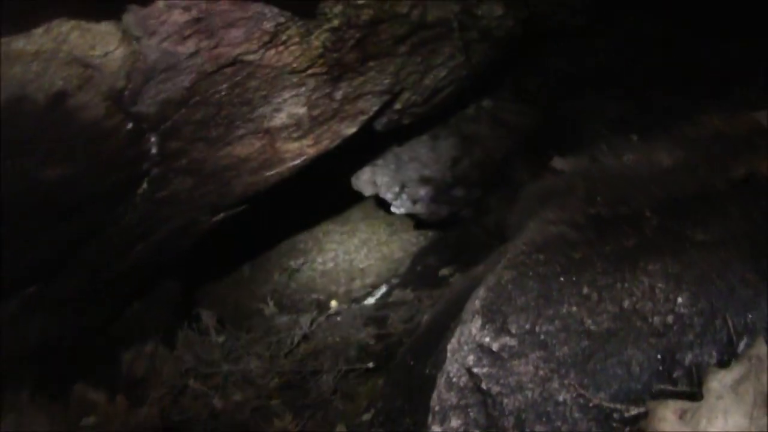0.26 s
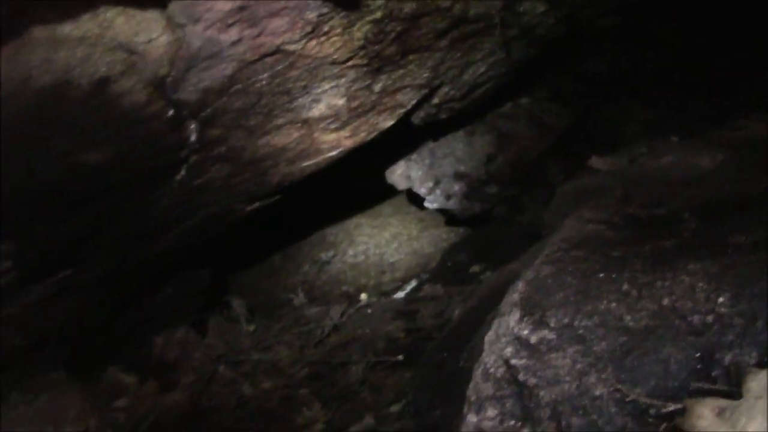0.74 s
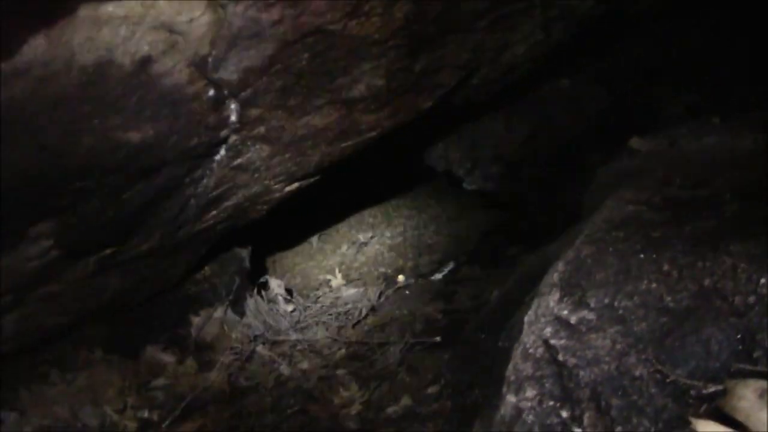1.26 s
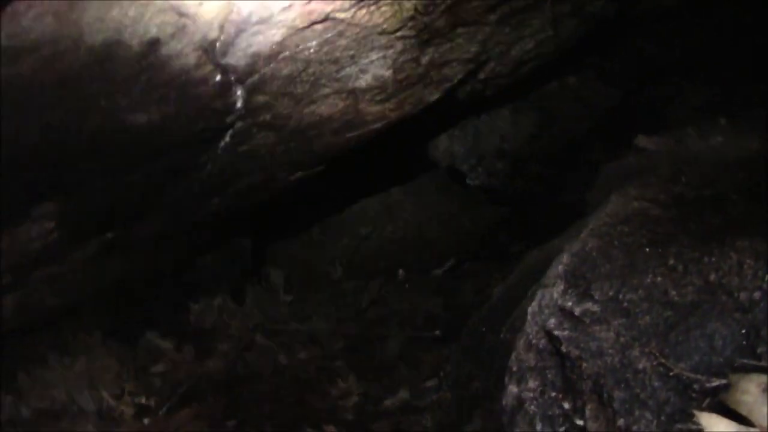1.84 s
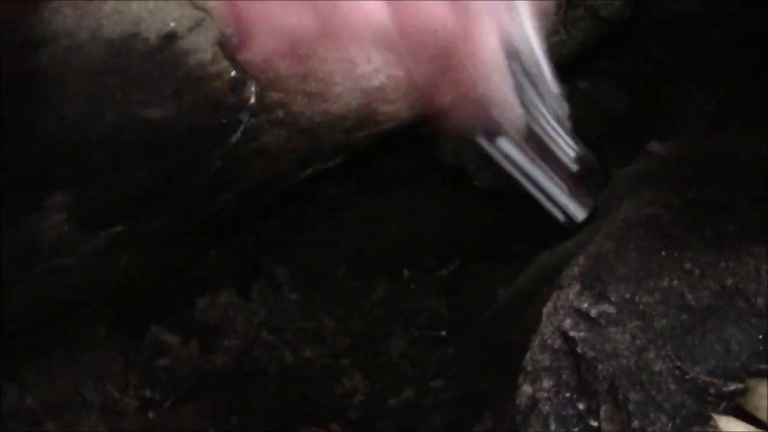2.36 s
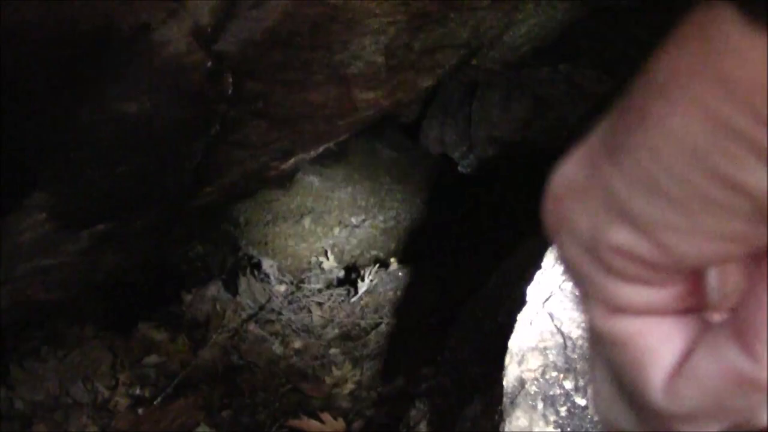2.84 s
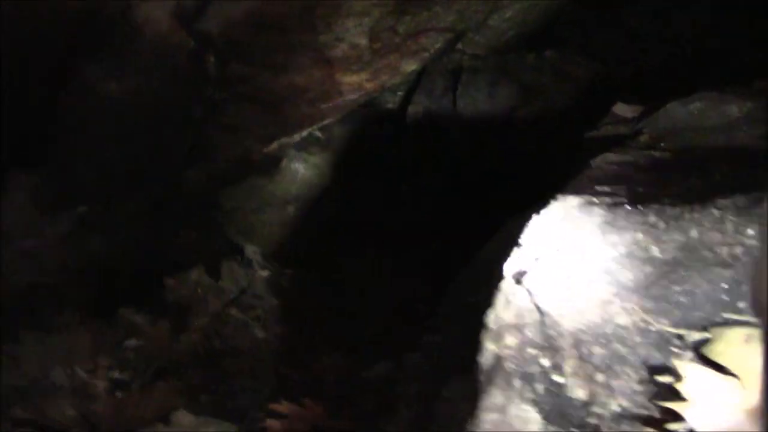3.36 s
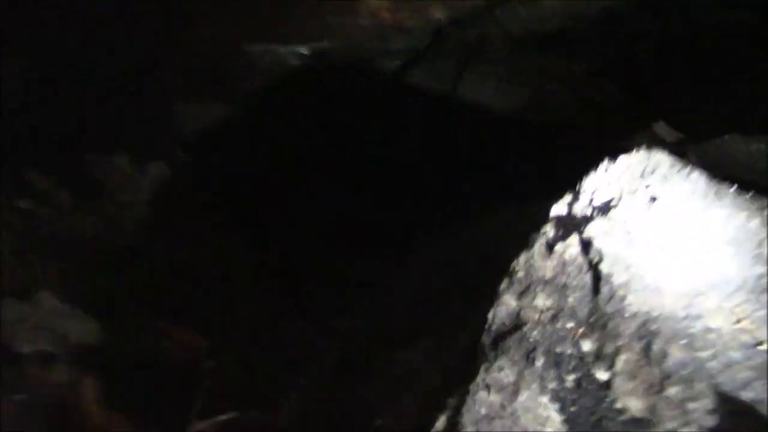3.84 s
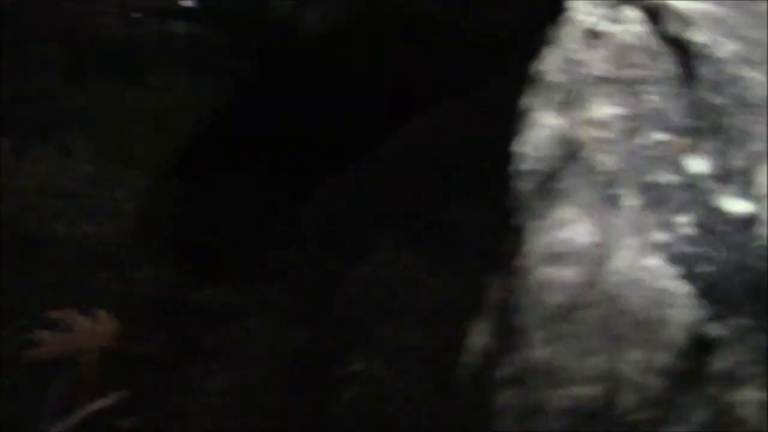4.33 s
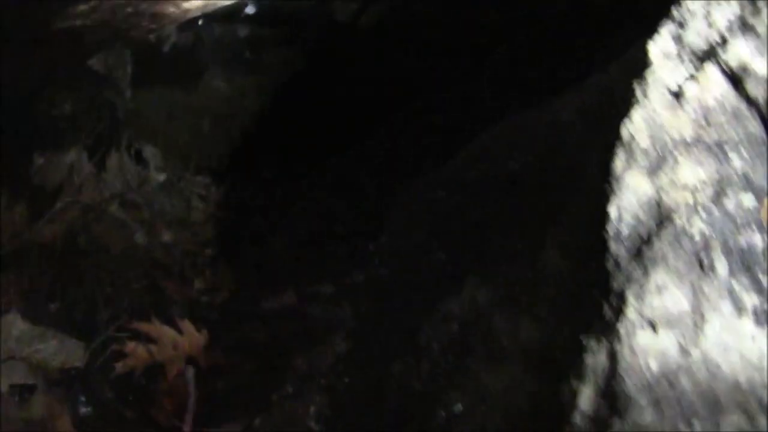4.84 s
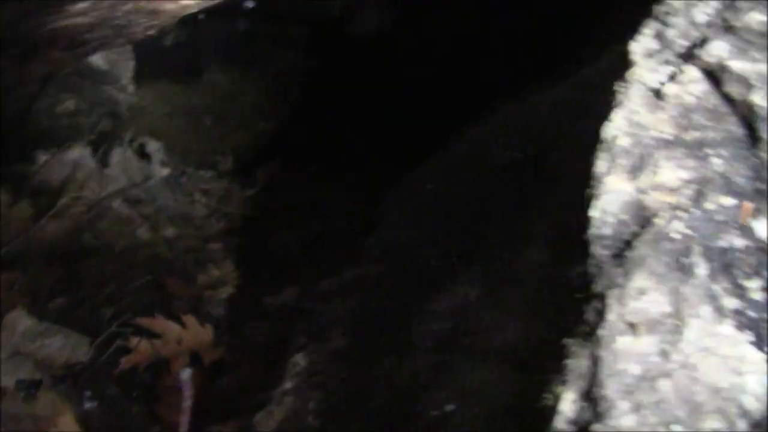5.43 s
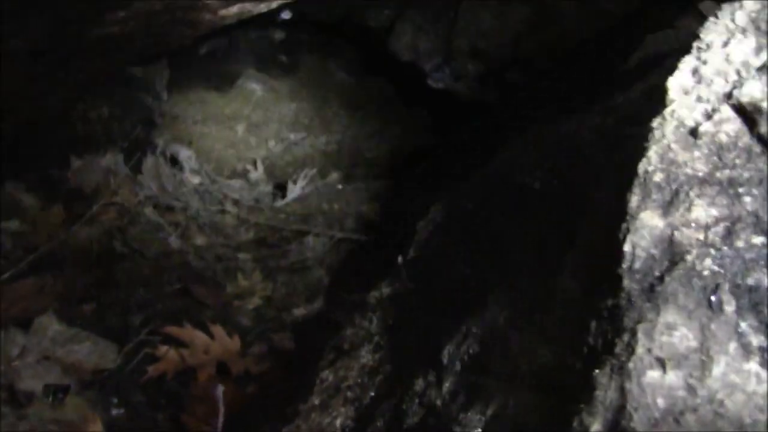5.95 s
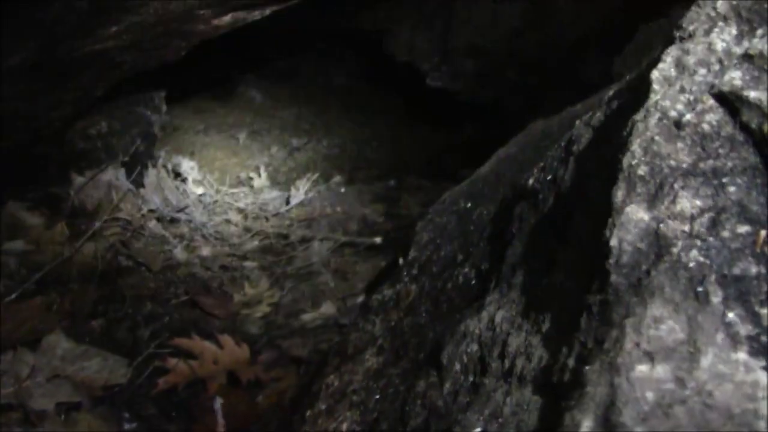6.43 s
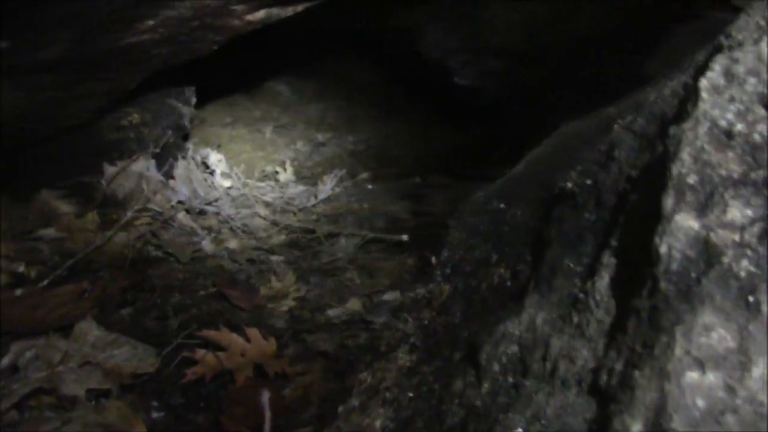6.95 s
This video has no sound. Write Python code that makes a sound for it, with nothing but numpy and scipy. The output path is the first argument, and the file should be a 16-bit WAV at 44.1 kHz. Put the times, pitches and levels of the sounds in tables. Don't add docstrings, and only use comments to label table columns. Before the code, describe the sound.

Close up in a rocky hollow in the woods, dry leaves tick quietly over a faint wash of air. A hand begins brushing them, with brittle snaps and low thumps on the camera body. It then shoves deep, making a loud, dense crunch full of breaking twigs. The crackling thins to scattered snaps and small settling ticks.

```python
import sys
import numpy as np
from scipy import signal
from scipy.fft import rfft, irfft
from scipy.io import wavfile
from scipy.ndimage import uniform_filter1d

SR = 44100
rng = np.random.default_rng(int(sys.argv[2]) if len(sys.argv) > 2 else 0)


def wrap_up_sound(samples):
    columns = np.atleast_2d(samples).T
    tamed = np.clip(columns, -1, 1)
    steps = np.round(tamed * 32767).astype(np.int16)
    wavfile.write(sys.argv[1], SR, steps)


def to_linear_factor(level_db):
    exponent = np.asarray(level_db, float) / 20
    return 10 ** exponent


N = 317079

# [f/Hz, level/dB per Hz]
AIR_SPECTRUM = [(15, -33), (25, -2), (170, 0), (249, -6), (354, -3), (560, -11), (734, -10.5), (2160, -18),
                (7510, -29), (12900, -30.5), (15800, -36)]
# [f/Hz, likeness 0-1]
AIR_LIKENESS = [(60, 0.67), (290, 0.48), (1400, 0.62), (15000, 0.55)]
AIR_DB = -42

# [lowest ring f/Hz, highest ring f/Hz, ring/cycles, cracks per s, size spread/dB]
LEAF_KINDS = [
    (480, 2050, 2.5, 1500, 3.0),
    (2500, 6400, 7, 3500, 3.6),
    (7000, 13800, 8, 4500, 3.6),
]
HIGH_RING_POWER = [.9, 1.0, .15]

# [t/s, level/dB]
BED = [(0, -47.5), (.3, -66.5), (1.5, -55), (1.69, -45), (1.89, -48), (2.1, -47), (3.0, -47.5),
       (3.1, -43.5), (3.33, -43.5), (3.47, -26.5), (4.0, -24), (4.33, -29.5), (4.43, -39), (4.93, -46),
       (4.98, -50.5), (5.6, -65), (5.74, -49), (6.0, -59)]
BRUSHES = [(.399, -44.5, 0.12, 0.13, 0.5), (1.917, -34, 0.0084, 0.093, 0.5),
           (1.987, -28, 0.019, 0.033, 2.5), (2.179, -36, 0.17, 0.18, -2), (2.291, -31, 0.062, 0.071, 0),
           (2.42, -40, 0.14, 0.022, 0), (2.509, -43.5, 0.089, 0.085, -2), (2.626, -32.5, 0.033, 0.024, -1),
           (2.724, -39.5, 0.13, 0.031, 0), (2.849, -41.5, 0.13, 0.1, 1), (2.978, -37.5, 0.016, 0.078, 0),
           (4.488, -32.5, 0.029, 0.23, 2.5), (4.64, -32.5, 0.032, 0.019, 6),
           (4.851, -41, 0.058, 0.083, 6.5), (4.934, -39, 0.077, 0.022, 8), (5.019, -35.5, 0.013, 0.071, 7),
           (5.108, -39.5, 0.081, 0.053, 2), (5.28, -41, 0.068, 0.079, 1), (5.465, -42, 0.11, 0.06, 0.5),
           (5.535, -42, 0.067, 0.011, -0.5), (5.78, -40.5, 0.042, 0.088, 3.5),
           (5.873, -34, 0.052, 0.044, 0), (5.936, -36.5, 0.074, 0.0061, -1),
           (6.525, -40, 0.025, 0.029, -0.5)]
SHOVES = [
    (3.372, -33.5, 0.026, 0.043, -4),
    (3.487, -27, 0.046, 0.32, 0.5),
    (3.727, -20, 0.09, 0.1, 1),
    (3.876, -19.5, 0.1, 0.076, 6.5),
    (4.08, -15, 0.066, 0.1, 1.5),
    (4.352, -18, 0.0077, 0.014, 2),
]
SLUMPS = [
    (.12, -48, .04, 0.12, 1),
    (.56, -53.5, 0.037, 0.15, -3),
    (.86, -52, .02, 0.031, -7),
    (5.65, -57.5, 0.037, 0.06, 14),
    (6.226, -48.5, 0.022, 0.12, -1.5),
    (6.61, -48.5, .02, 0.055, -3),
    (6.76, -54, 0.054, 0.043, 5),
    (6.96, -58, .05, 0.041, 6.5),
]
GRIPS = [(1.968, -33, 0.0055, 0.024, -2), (2.012, -34.5, .02, 0.028, 1), (2.023, -34, 0.0099, .007, 3),
         (3.415, -35, 0.023, 0.035, -2), (3.5, -33, 0.026, 0.021, 0), (3.7, -31, 0.014, 0.044, -5),
         (3.858, -23, .008, .04, 1), (3.892, -21.5, .03, 0.02, 7), (3.945, -20, 0.028, 0.036, 3),
         (4.034, -23, .008, 0.064, 8), (4.13, -21.5, .012, 0.073, 0), (4.2, -23.5, .03, 0.066, 7),
         (4.31, -19.5, 0.0072, .012, 4), (4.4, -28, 0.032, 0.025, 0), (4.57, -43.5, .05, 0.05, 7),
         (4.975, -39, 0.0078, .008, 1), (5.43, -46, 0.027, .04, -4), (5.055, -34.5, 0.026, 0.031, 2.5),
         (5.84, -38.5, 0.012, 0.067, 0), (5.907, -35.5, .04, 0.045, 1)]
STROKE_DB, STROKE_BEND = 15.5, 0.97
SOFT_DB, SOFT_PER_DB, SOFT_TILT = -1.5, -0.1337, 0.89
EDGE_DB, EDGE_PER_DB = -1.5, -0.0543
REST_FROM_DB, REST_PER_DB, REST_S = 23.5, 0.1, 0.015

# [t/s, echo share 0-1]
ROCK_SHARE = [
    (4.9, 0),
    (5.2, .15),
    (5.95, .15),
    (6.1, 0),
]
ROCK_LAG = 17
ROCK_SOFT_DB = 10

TICKS = [(0.059, -23, 5900, 8600, 1.2), (0.1216, -18.5, 4030, 6500, 1.5), (0.15, -27, 2600, 9800, 1.4),
         (0.3502, -22, 2470, 5200, 2.2), (0.3861, -26, 2500, 7900, 2), (0.508, -24, 1800, 5300, 0.5),
         (0.52, -25.5, 1900, 4580, 0.69), (0.6004, -30, 2200, 6200, 1.65), (0.7761, -24.5, 3350, 8400, 1.3),
         (0.8601, -28, 4000, 8400, 0.76), (0.9632, -31, 3400, 8400, 1.32),
         (1.1274, -28.5, 2500, 8450, 0.95), (1.3538, -16.5, 4700, 10700, 0.53),
         (1.78, -24, 2600, 9900, 0.83), (5.26, -27, 2900, 12200, 1.3), (5.278, -23, 1800, 9400, 1.1),
         (5.4595, -20, 2400, 9500, 0.75), (5.5406, -25, 2200, 9400, 0.9), (5.6149, -28, 3700, 9450, 0.66),
         (5.758, -24, 4600, 7400, 0.9), (5.8357, -20, 3400, 11300, 0.56), (5.9295, -19, 2100, 9100, 0.46),
         (5.943, -19.5, 4200, 12000, 1.7), (6.2149, -25, 1800, 13100, 2.4), (6.529, -29, 2400, 8400, 0.5),
         (6.5484, -25, 6000, 14000, 0.69), (6.5976, -20.5, 5560, 12600, 1.2),
         (6.989, -18, 3150, 10200, 0.6), (7.1768, -28, 2600, 9200, 0.9)]
RIBS = [(1.9174, -20.5, 4030, 11000, 1.9), (1.9746, -12, 2100, 10000, 1), (2.073, -23.5, 2100, 7600, 1),
        (2.1908, -7.5, 2270, 8300, 0.47), (2.273, -9, 6850, 13400, 0.55), (2.2986, -10.5, 2480, 11100, 1.2),
        (2.3538, -12, 2600, 11800, 0.87), (2.3662, -20, 3700, 11500, 0.81),
        (2.3924, -15.5, 3400, 10000, 1.05), (2.4154, 0, 2800, 13600, 0.65),
        (2.503, -15.5, 4100, 11200, 0.96), (2.5162, -21.5, 2500, 10000, 0.8),
        (2.5658, -11, 4970, 12200, 0.91), (2.6243, -1.5, 3850, 10300, 0.63),
        (2.634, -16, 5200, 11500, 0.74), (2.6413, -11, 5500, 13900, 0.77), (2.6935, -19, 5600, 13100, 0.68),
        (2.7105, -8, 3840, 11400, 0.45), (2.786, -5.5, 5860, 13200, 0.78), (2.8189, -14, 7600, 12700, 0.54),
        (2.8437, -16, 2740, 9000, 1.8), (2.874, -15, 4930, 12400, 1.0), (2.933, -20, 4420, 10700, 2.9),
        (2.9727, -13, 4700, 10100, 0.59), (2.98, -6.5, 3150, 10500, 0.77), (3.0241, -12, 2330, 6500, 0.7),
        (3.0335, -13, 5140, 13800, 0.87), (3.0738, -17, 2400, 9300, 0.6), (3.175, -19.5, 4400, 9600, 0.73),
        (3.3075, -23, 3000, 7300, 0.6)]
TWIGS = [(3.371, -13, 6800, 13700, 1.7), (3.473, -5, 4070, 10400, 1.2), (3.5893, 1, 2710, 8900, 0.88),
         (3.6227, -2.5, 2130, 6950, 1), (3.7264, -6, 4500, 9400, 2), (3.7933, 2, 4100, 8100, 0.42),
         (3.857, -3, 2000, 9600, 1.3), (3.9163, 0, 2900, 5300, 0.7), (3.948, -4, 3500, 7900, 0.5),
         (4.032, -3.5, 5400, 12500, 1.1), (4.1035, -3, 5460, 11500, 0.5), (4.127, -12, 2200, 8800, 0.8),
         (4.1665, -8, 2800, 6500, 0.56), (4.202, -8, 2000, 9200, 0.62), (4.3066, -12, 3500, 10500, 1.5),
         (4.3518, -4.5, 3820, 8250, 1.38), (4.3784, -9, 4500, 14300, 0.66),
         (4.4234, -1.5, 4830, 11200, 0.62), (4.481, -4, 3900, 8800, 0.69), (4.5242, -13, 5400, 7700, 1.1),
         (4.6429, -13, 2390, 10900, 0.9), (4.712, -19.5, 3240, 9900, 2.3), (4.7573, -21, 2600, 11900, 1.7),
         (4.8071, -16, 2200, 12600, 0.65), (4.9309, -18, 2250, 12700, 1.3),
         (4.955, -15.5, 9700, 13300, 1.6), (4.98, 0, 3480, 12200, 0.37), (5.015, -11, 3930, 14800, 0.99),
         (5.0334, -17, 7100, 12400, 1.7), (5.0956, -20, 2200, 10000, 0.98)]
# [break t/s, peak level/dB, centre f/Hz]
SPLINTERS = [(0.0057, -28, 2580), (0.0623, -34, 2100), (0.1288, -29, 6000), (0.2295, -25, 2400),
             (0.301, -27, 2100), (0.3553, -24, 4460), (0.5027, -31, 3600), (0.7425, -34, 1900),
             (0.7492, -35, 3400), (0.778, -24, 2210), (0.8002, -36, 1900), (0.8761, -40, 4800),
             (1.1752, -34, 8650), (1.5667, -31.5, 4100), (1.5894, -25, 3600), (1.9457, -15, 1880),
             (1.9785, -5.5, 4200), (1.9876, -15, 10300), (1.9957, -16, 5200), (2.0109, -11, 2800),
             (2.0442, -24, 2580), (2.292, -19, 7400), (2.3275, -14, 1880), (2.3726, -24, 2800),
             (2.4015, -19, 2900), (2.4198, -17, 11200), (2.476, -19, 5300), (2.5422, -28, 4300),
             (2.6472, -15.5, 12500), (2.675, -21, 13300), (2.6867, -26, 6200), (2.792, -14.5, 4130),
             (2.8564, -27, 3400), (2.8602, -26, 6400), (2.8951, -20, 10300), (2.9179, -22, 5300),
             (2.9377, -23, 9600), (2.9462, -31, 5300), (2.9664, -28, 8300), (3.0283, -21, 9600),
             (3.1339, -33, 5500), (3.1508, -31, 5000), (3.192, -19, 4300), (3.211, -28, 2090),
             (3.2606, -21, 8400),
             (3.3646, -25, 6900), (3.3744, -15, 2780), (3.438, -13, 5200), (3.4621, -22, 4500),
                   (3.4837, -3, 5300), (3.4867, -11, 5560), (3.5318, -8, 3600), (3.5434, -6, 7100),
                   (3.599, -1, 5000), (3.6973, -11, 3800), (3.7084, -7, 6600), (3.734, -10, 4300),
                   (3.782, -11, 2080), (3.9657, -7, 4300), (3.9785, -21, 5300), (3.9922, -3, 2730),
                   (3.9963, -18, 5200), (4.014, -14, 5700), (4.1344, -10, 5900), (4.1712, -7.5, 6500),
                   (4.1844, -12, 4700), (4.216, -14, 4100), (4.2251, -8, 4000), (4.2427, -11, 5730),
                   (4.3227, -18, 4000), (4.3261, -23, 3600), (4.3301, -11.5, 9600), (4.3396, -18, 6900),
             (4.3546, -4, 6860), (4.466, -13, 7100), (4.4871, -4, 7800), (4.528, -13, 3280),
                  (4.5313, -11, 5700), (4.616, -21, 7900), (4.6222, -20, 7400), (4.6754, -35, 11000),
                  (4.6895, -25, 7200), (5.0256, -23, 9500), (5.036, -19, 5700), (5.0553, -12, 3300),
                  (5.1005, -20, 7800), (5.1089, -22, 3630), (5.3453, -27, 8600), (5.434, -27, 1900),
                  (5.455, -32, 2110), (5.6458, -31, 11000), (5.7278, -27, 6700), (5.7966, -25, 6400),
                  (5.947, -20, 10700), (6.1138, -28, 5850), (6.1283, -31, 2100), (6.244, -26, 5700),
                  (6.3042, -28.5, 4840), (6.3922, -29, 5300), (6.6017, -23, 2350), (6.6499, -34, 5300),
                  (6.7872, -36, 3400), (6.9327, -32.5, 5300), (6.9651, -38, 1900), (6.9929, -22.5, 4230)]
SPLINTER_WIDE, SPLINTER_MS = 1.32, 0.66
SNAP_PAN_DB, PAN_PER_KHZ_DB, PAN_SPREAD_DB = 5, -0.58, 1
STRAY_DB, STRAY_SPREAD_DB, STRAY_MS = -42, 4, .7
LEAD = .003

# [peak t/s, peak level/dB, ring f/Hz, t60/s]
STEMS = [(0.1243, -27.5, 685, 0.011), (0.2977, -29, 1460, 0.0084), (1.588, -29, 533, 0.02),
         (1.9445, -24, 1030, 0.022), (1.972, -23, 847, 0.053), (1.985, -31, 890, 0.044),
         (2.0427, -20, 2350, 0.011), (2.3274, -18, 1590, 0.0055), (2.4166, -19, 1890, 0.012),
         (2.6239, -20, 2250, 0.012), (3.026, -25, 1020, 0.0071), (3.59, -19, 1430, 0.0079),
         (3.621, -10, 1440, 0.011), (3.711, -22, 471, 0.039), (4.3542, -11.5, 484, 0.017),
         (4.6423, -24, 1850, 0.0076), (4.808, -29, 1060, 0.0097), (4.93, -23.5, 477, 0.016),
         (5.0957, -30, 493, 0.024), (5.211, -34, 1980.0, 0.019), (5.4372, -26.5, 1200, 0.02),
         (5.946, -18.5, 524, 0.0047), (6.215, -26.5, 824, 0.01)]
# [t/s, level/dB]
GRIP_RUMBLE = [
    (2.15, -44.5),
    (2.33, -39),
    (2.45, -48),
    (2.9, -45),
    (3.3, -43),
    (4.1, -37),
    (4.75, -53),
]
# [t/s, peak level/dB, f/Hz, t60/s, left-right/dB]
KNOCKS = [(2.234, -10.5, 353, 0.028, 0), (2.254, -21, 96, 0.052, 0.0), (2.274, -12, 258, 0.032, -1.0),
          (2.292, -1, 106, 0.018, 1.5), (2.31, -22, 80, 0.075, -4), (3.478, -11.5, 330, 0.0314, -1),
          (3.712, -10, 310, 0.029, -2), (4.137, -6, 146.5, 0.068, -17.5), (4.352, -2, 168, 0.0096, -12),
          (4.699, -7, 187, 0.016, -1.5), (4.919, -38, 315, 0.055, -0.5)]


def evened(x):
    return x / np.sqrt(np.mean(x ** 2) + 1e-20)


def read(points, hz):
    f, value = np.transpose(points)
    return np.interp(np.log(hz + 1), np.log(f + 1), value)


def add(mix, s, sound):
    part = mix[:, round(s * SR):][:, :sound.shape[1]]
    part += sound[:, :part.shape[1]]


def ring(hz, t60, t):
    return np.sin(2 * np.pi * hz * t) * to_linear_factor(-60 * np.maximum(t, 0) / t60) * (t >= 0)


def sides(pan_db):
    return to_linear_factor([[pan_db / 2], [-pan_db / 2]])


def wander(per_s, at=None):
    steps = rng.standard_normal(8000)
    at = np.arange(N) if at is None else at
    return evened(np.interp(at / SR * per_s, np.arange(len(steps)), steps))


def air(patchy_db=0.3, swell_db=0.5):
    frames, hz = N // 256 + 5, np.fft.rfftfreq(1024, 1 / SR)
    a, b, c, d, patches = rng.standard_normal((frames, 513, 5)).T
    patches = uniform_filter1d(patches, size=12, axis=0)
    patches = evened(uniform_filter1d(patches, size=14, axis=1))
    swell = evened(uniform_filter1d(rng.standard_normal(frames), size=60))
    same = np.clip(read(AIR_LIKENESS, hz), -1, 1)[:, None]
    left = a + 1j * b
    right = same * left + np.sqrt(1 - same ** 2) * (c + 1j * d)
    level_db = read(AIR_SPECTRUM, hz)[:, None] + patchy_db * patches + swell_db * swell
    spectra = np.array([left, right]) * to_linear_factor(level_db)
    wash = signal.istft(spectra, nperseg=1024, noverlap=768)[1][:, :N]
    return to_linear_factor(AIR_DB) * evened(wash) * sides(-0.92)


def resting(s, level_db):
    at, db = np.transpose(TICKS + RIBS + TWIGS)[:2, :, None]
    since = (s - at - .004) / REST_S
    depth_db = REST_PER_DB * np.clip(db - np.interp(at, s, level_db) - REST_FROM_DB, 0, 14)
    return (depth_db * np.exp(-since ** 2) * (since > 0)).sum(0)


def stirring():
    s = np.arange(0, N / SR + .01, .001)
    at, db, build, fade, brittle = np.transpose(BRUSHES + SHOVES + SLUMPS + GRIPS)[:, :, None]
    before = (at - s) / np.maximum(build, .004)
    after = (s - at) / np.maximum(fade, .004)
    away = np.where(s < at, before, after)
    strokes = to_linear_factor(2 * (db - STROKE_DB * away ** STROKE_BEND))
    power = to_linear_factor(2 * np.interp(s, *np.transpose(BED))) + strokes.sum(0)
    level_db = 10 * np.log10(power)
    tilt_db = (strokes * brittle).sum(0) / power
    level_db = level_db - resting(s, level_db)
    soft_db = SOFT_DB + SOFT_PER_DB * (level_db + 35) - SOFT_TILT * tilt_db
    soft_db += ROCK_SOFT_DB * np.interp(s, *np.transpose(ROCK_SHARE))
    edge_db = EDGE_DB + EDGE_PER_DB * (level_db + 35) + tilt_db
    return s, level_db, soft_db, edge_db


def rustle(clump_db=2.2, patch_db=2.8, spread_db=2.2, count=13):
    s, level_db, soft_db, edge_db = stirring()
    lag_s = 1e-5
    clock, t = np.arange(N) / SR, np.arange(500) / SR
    out = np.zeros((2, N))
    calm = np.clip(-(np.interp(clock, s, level_db) + 13) / 28, .55, 1)
    crowd = 1.3 + 1.1 * (1 - calm)
    clumps_db = clump_db * calm * 1.8 * np.tanh(0.97 * wander(220) + 0.35 * wander(50))
    levels_db = (level_db + soft_db, level_db, level_db + edge_db)
    for kind, power, db in zip(LEAF_KINDS, HIGH_RING_POWER, levels_db):
        lo_hz, hi_hz, cycles, per_s, size_db = kind
        size = to_linear_factor(size_db * np.minimum(rng.exponential(1, N), 2.35 + 1.2 * (1 - calm)))
        size *= rng.random(N) < crowd * per_s / SR
        size *= rng.choice([-1, 1], N) * to_linear_factor(clumps_db) / np.sqrt(crowd)
        patch, layer = rng.integers(0, count, N), np.zeros((2, N))
        for k, hz in enumerate(np.geomspace(lo_hz, hi_hz, count)):
            way = rng.standard_normal()
            lags = 1e-4 + np.array([[-.5], [.5]]) * lag_s * np.clip(way, -2, 2)
            tiny_crack = ring(hz, 3 * cycles / hz, t - lags) * (hz / lo_hz) ** power
            tiny_crack *= sides(spread_db * way - 2.1 * hz / 10000)
            at, hits = np.flatnonzero((patch == k) & (size != 0)), np.zeros(N)
            hits[at] = size[at] * to_linear_factor(patch_db * wander(10, at))
            layer += signal.oaconvolve(hits[None], tiny_crack, axes=1)[:, :N]
        out += evened(layer) * to_linear_factor(np.interp(clock, s, db))
    return out * sides(0.082)


def snap(peak_db, lo_hz, hi_hz, length_ms, pan_db, skirt=0.28, unlike=0.35, spike=0.95, tail=0.13, rings=0.56):
    t, hz = np.arange(1024) / SR - LEAD, np.fft.rfftfreq(1024, 1 / SR) + 1
    band = skirt / (1 + (1500 / hz) ** 4)
    band += 1 / np.sqrt((1 + (lo_hz / hz) ** 6) * (1 + (hz / hi_hz) ** 6))
    low_ring = 1.5 * rings / (1 + 1j * (hz / (1.08 * lo_hz) - 1) / 0.14)
    high_ring = rings / (1 + 1j * (hz / (0.91 * hi_hz) - 1) / 0.14)
    band = band * (1 + low_ring + high_ring) / (1 + (hz / 15500) ** 4)
    last = np.clip(length_ms - .2, .15, 4) / 1000
    creak = np.exp(t / (.5 * last))
    spray = np.exp(-t / (2 * last)) + tail * np.exp(-t / 0.0053)
    noise = rng.standard_normal((3, len(t)))
    drive = (noise[0] + unlike * noise[1:]) * np.where(t < 0, creak, spray)
    drive[:, round(LEAD * SR)] += spike * rng.choice([-1, 1]) * .002 / last
    body = irfft(rfft(drive) * band)
    peak = abs(signal.hilbert(body.mean(0))).max()
    return to_linear_factor(peak_db) * body / peak * sides(pan_db)


def snaps():
    out = np.zeros((2, N))
    splinters = [(s, db, hz / SPLINTER_WIDE, hz * SPLINTER_WIDE, SPLINTER_MS)
                 for s, db, hz in SPLINTERS]
    for s, db, lo_hz, hi_hz, ms in TICKS + RIBS + TWIGS + splinters:
        pan_db = SNAP_PAN_DB + PAN_PER_KHZ_DB * hi_hz / 1000 + PAN_SPREAD_DB * rng.standard_normal()
        add(out, s - LEAD, snap(db + 0.065, lo_hz, hi_hz, ms, pan_db))
    return out


def strays(count=50):
    out = np.zeros((2, N))
    for when, pitch, size, side in rng.random((count, 4)):
        hz = 2500 * 4.5 ** pitch
        peak_db = STRAY_DB - STRAY_SPREAD_DB * np.log(size + 0.1)
        add(out, when * N / SR, snap(peak_db, hz / 2, hz * 2, STRAY_MS, 6 * side - 4.5))
    return out


def cleft(x, t60=.04):
    at = np.arange(40, 3000, 20)
    taps = np.zeros((2, 3020))
    places = at + rng.integers(0, 20, (2, len(at)))
    np.put_along_axis(taps, places, rng.choice([-1., 1.], (2, len(at))), 1)
    taps -= .65 * np.roll(taps, 4, axis=1)
    taps *= to_linear_factor(-60 * np.arange(3020) / SR / t60)
    return signal.oaconvolve(x, taps / np.linalg.norm(taps[0]), axes=1)[:, :N]


def stem_crack(peak_db, hz, t60):
    t = np.arange(1800) / SR - LEAD + 0.39 / hz
    body = ring(hz, t60, t) + .5 * ring(1.476 * hz, 1.05 * t60, t)
    return to_linear_factor(peak_db) * body * sides(-0.46)


def handling(lumpy_db=-2.5, unlike=1.7):
    s, db = np.transpose(GRIP_RUMBLE)
    sos = signal.butter(2, [40, 320.6], "bandpass", fs=SR, output="sos")
    noise = evened(signal.sosfilt(sos, rng.standard_normal((2, N))))
    level_db = np.interp(np.arange(N) / SR, s, db, left=-90, right=-90) + lumpy_db * wander(25)
    return evened(noise[0] + unlike * noise) * to_linear_factor(level_db + 3) * sides(-4)


def knock(peak_db, hz, t60, pan_db):
    t = np.arange(6000) / SR
    body = ring(hz, t60, t) + 0.19 * ring(2.36 * hz, 1.3 * t60, t)
    return to_linear_factor(peak_db - 1.5) * body * (1 - np.exp(-t / 0.0043)) * sides(pan_db)


def scene():
    leaves, case = rustle(), handling()
    share = np.interp(np.arange(N) / SR, *np.transpose(ROCK_SHARE))
    echo = share * np.roll(leaves, ROCK_LAG, axis=1)
    leaves = (leaves + echo) / np.sqrt(1 + share ** 2)
    leaves = leaves + snaps() + strays()
    for s, *stem in STEMS:
        add(leaves, s - LEAD, stem_crack(*stem))
    for s, *blow in KNOCKS:
        add(case, s, knock(*blow))
    return leaves + to_linear_factor(-12.5) * cleft(leaves) + case + air()


def band_limit(x):
    return signal.sosfilt(signal.butter(12, 16830, fs=SR, output="sos"), x)


def record(dry):
    clipped = np.clip(dry, -.86, .86)
    lowpass = signal.firwin(255, 15900, window=("kaiser", 7), fs=SR)
    finished = signal.oaconvolve(clipped, lowpass[None], "same")
    return band_limit(finished)


dry = scene()
out = record(dry)
wrap_up_sound(out)
```